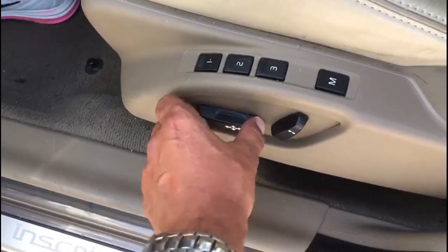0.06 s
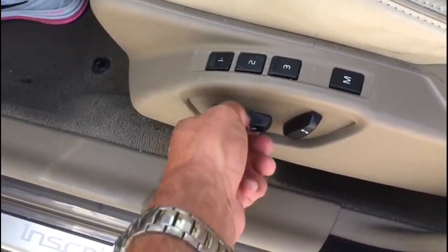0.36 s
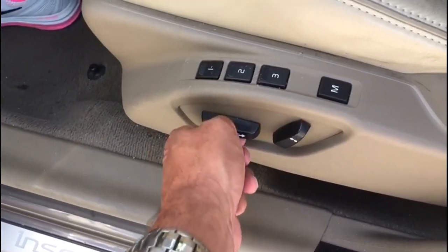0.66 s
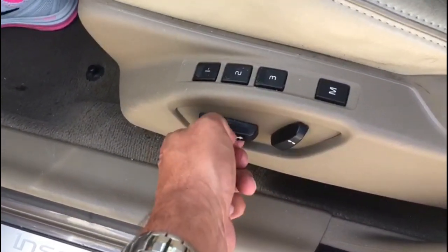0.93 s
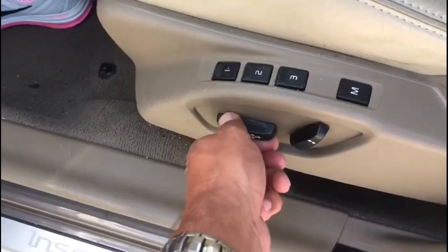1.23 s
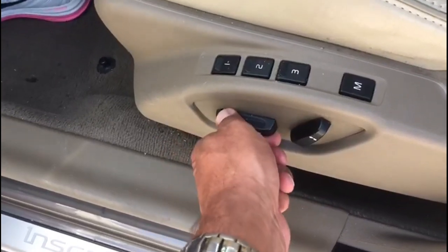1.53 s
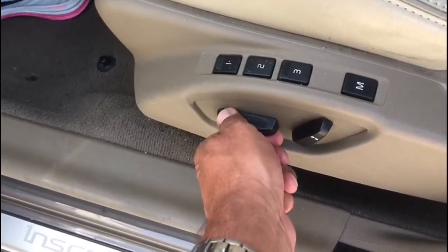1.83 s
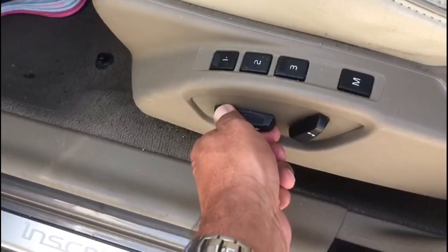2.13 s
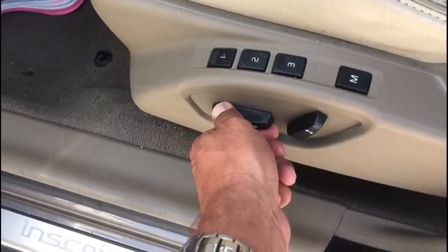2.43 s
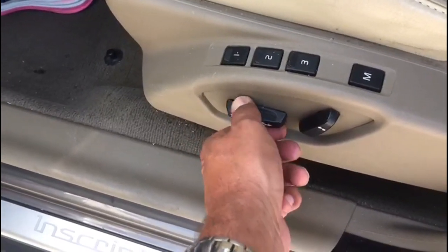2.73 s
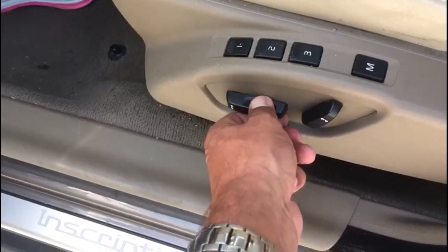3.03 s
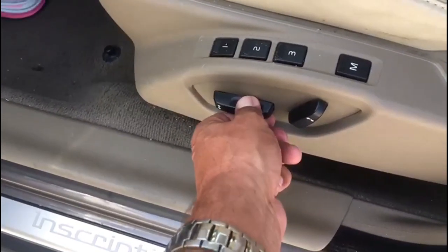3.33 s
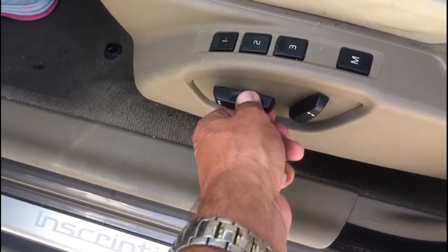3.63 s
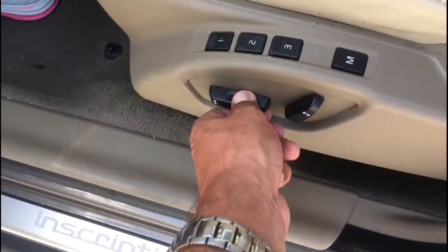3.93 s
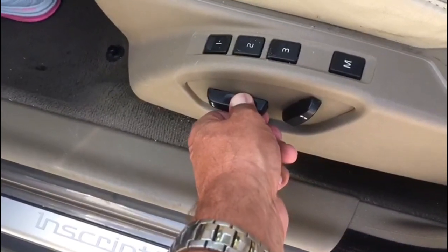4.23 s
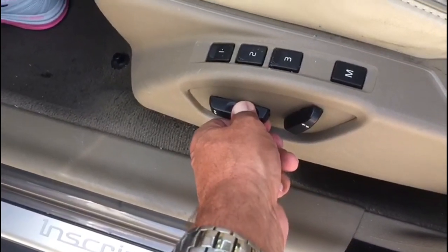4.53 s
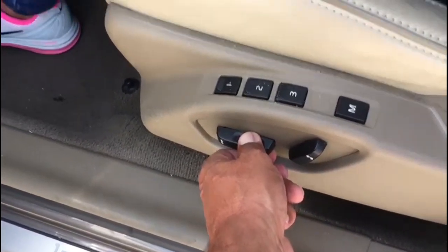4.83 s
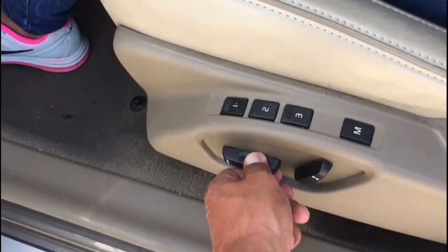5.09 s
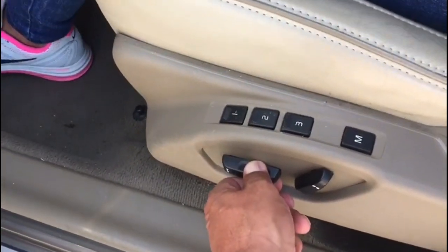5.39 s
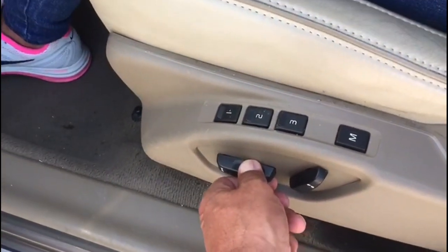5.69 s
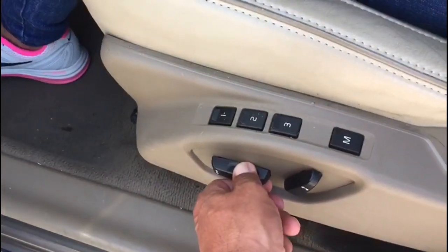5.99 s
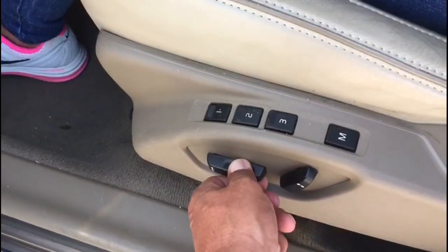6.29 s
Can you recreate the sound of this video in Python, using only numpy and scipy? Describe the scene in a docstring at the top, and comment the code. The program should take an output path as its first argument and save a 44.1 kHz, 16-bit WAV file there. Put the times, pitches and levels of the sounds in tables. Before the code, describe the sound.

Close to the microphone, a plastic seat switch clicks and taps unevenly while a hand bumps and brushes the side panel, and a small electric motor gives two short whirs. Then the clicking nearly ceases and the seat motor runs on with a quiet, thin, slightly raspy whine. Underneath, the parked car's idling engine makes an uneven low rumble in the cabin, with soft air from the vents.

```python
"""Inside a parked car, one microphone close beside the power seat.
The small seat motor runs in two short spells, then whines on, wavering with each turn of its worm wheel.
Within arm's reach the plastic switch clicks, a hand bumps and rubs the trim, and there are dull thumps
and knocks. Farther off the idling engine hums through the cabin, over faint ventilation and hiss."""
import sys
import numpy as np
from scipy import signal
from scipy.fft import rfft, irfft, next_fast_len
from scipy.io import wavfile
from scipy.ndimage import uniform_filter1d

SR = 44100
rng = np.random.default_rng(int(sys.argv[2]) if len(sys.argv) > 2 else 0)


def pcm_store(signal):
    """Save signal as 16-bit PCM."""
    levels = np.round(np.clip(np.atleast_2d(signal), -1, 1) * 32767)
    wavfile.write(sys.argv[1], SR, levels.astype(np.int16).T)


N = 280027
TIME = np.arange(N) / SR

ROTOR_SLOTS, WHEEL_TEETH = 10, 40
# spells with the switch held: (on [s], off [s], friction level [dB], rasp level [dB])
MOTOR_RUNS = [(-0.1, 0.23, -58, -70), (1.651, 2.05, -69, -71.5), (3.069, 6.5, -58.5, -70)]
# set speed of the motor, heard as its slot whine: (time [s], pitch [Hz], level [dB])
SLOT_WHINE = [(0, 1780, -64), (1.9, 1775, -71), (3.25, 1740, -63), (3.52, 1815, -64), (4.1, 1818, -62.5),
              (4.7, 1850, -61.8), (5.1, 1857, -63), (5.55, 1800, -64.5), (5.9, 1802, -64),
              (6.35, 1760, -59.5)]
# strain on the gears as the seat travels: (time [s], strain [0-1])
GEAR_STRAIN = [(0, 0), (1.75, 1), (2.1, 0.6), (3.05, 0), (4.1, 0), (4.6, 0.1), (5.2, 0.44), (5.5, 0.82),
               (6.35, 0.72)]
# tones relative to the slot whine: (order [x rotor speed], easy level [dB], strained level [dB])
ROTOR_TONES = [(1, 1, 12), (3, -8, -5), (5, -12, -11), (6, -12, -11), (13, -17, -14), (14, -15, -7),
               (18, -14, -15), (26, -25, -8.5), (30, -20, -27), (32, -19, -16), (34, -15, -10),
               (36, -22, -16), (42, -21, -26), (44, -17, -17), (48, -32, -28), (62, -29, -27),
               (64, -32, -34)]
# friction noise through the seat frame: (frequency [Hz], level [dB per Hz])
FRICTION_SPECTRUM = [(210, -11), (350, 4.5), (406, -3.5), (530, -4), (813, -8.5), (902, -6), (1610, -7),
                     (1810, -9), (1950, -7), (2360, -5.5), (2940, -13), (3220, -15.5), (4940, -22.5),
                     (6260, -18), (12000, -30.5), (15600, -68), (22000, -120)]
# gear housing resonances: (frequency [Hz], width [Hz], level [dB])
HOUSING_MODES = [(2360, 160, 0), (3130, 62, 5.5), (3830, 770, -0.5), (4490, 140, 7), (5370, 200, 0),
                 (6170, 110, -6), (6560, 200, -4.5), (8020, 150, -11), (10700, 210, -6)]
# narrow dips in the motor's hiss, from reflections off the floor and sill:
# (frequency [Hz], width [Hz], depth [0-1])
MOTOR_NOISE_DIPS = [(397, 74, 0.86), (760, 53, 0), (1114, 120, 0.7), (2030, 85, 0.57), (2910, 200, 0.7),
                    (4420, 170, 0.97), (5650, 230, .4), (7450, 380, 0.9), (8400, 400, 0.6),
                    (10600, 260, 0.5)]
def seat_motor(slot_flutter_db=1.15, flutter_db=3.5, chop=0.25, strain_rasp_db=4, noise_db=1.0):
    """Close up, under the seat: slots whine, other rotor orders sing, brushes and gears hiss in step."""
    whine_hz, whine_db = in_time(SLOT_WHINE)
    strain, = in_time(GEAR_STRAIN)
    power = sum(running(on, off) for on, off, *_ in MOTOR_RUNS)
    angle = rotor_angle(whine_hz, power)
    tones = from_db(slot_flutter_db * drift(25)) * np.sin(ROTOR_SLOTS * angle)
    for order, easy_db, strained_db in ROTOR_TONES:
        order_db = easy_db + strain * (strained_db - easy_db)
        tones += from_db(order_db + flutter_db * drift(6.7)) * np.sin(order * angle)
    friction_gain = sum(from_db(db) * running(on, off) for on, off, db, _ in MOTOR_RUNS)
    rasp_gain = sum(from_db(db) * running(on, off) for on, off, _, db in MOTOR_RUNS)
    contact = 1 + chop * np.sin(2 * angle)   # two brushes scrape twice a turn
    friction = friction_gain * coloured_noise(FRICTION_SPECTRUM) * contact
    housing = resonate(rng.standard_normal(N) * contact, HOUSING_MODES)
    rasp = rasp_gain * from_db(strain_rasp_db * strain) * housing
    noise = cancel(friction + rasp, MOTOR_NOISE_DIPS)
    return power * from_db(whine_db) * tones + from_db(noise_db) * noise


def running(on_s, off_s, spin_up_s=0.03, coast_s=0.04):
    """The motor spins up when switched on and coasts down when released; 0-1."""
    spin_up = 1 - np.exp(-np.maximum(TIME - on_s, 0) / spin_up_s)
    return spin_up * np.exp(-np.maximum(TIME - off_s, 0) / coast_s)


def rotor_angle(whine_hz, power, start_sag=0.1, swing_hz=19, freest_s=4.89, slip_rad=0.02):
    """The rotor is slower as it starts and stops, and sags as the worm wheel binds once a turn."""
    hz = whine_hz * (1 - start_sag * (1 - power))
    wheel_turns = np.cumsum(hz) / SR / ROTOR_SLOTS / WHEEL_TEETH
    wheel_turns -= np.interp(freest_s, TIME, wheel_turns)
    hz = hz + swing_hz * np.cos(2 * np.pi * wheel_turns)
    # uneven drag makes the rotor run slightly ahead and behind, which blurs the highest orders
    return 2 * np.pi * np.cumsum(hz / ROTOR_SLOTS) / SR + slip_rad * drift(8)


# contacts of the switch: (time [s], relative peak [dB], main ring [Hz], ring prominence [dB],
# brightness [dB per octave], body [dB])
SWITCH_CLICKS = [(0.2186, -25.5, 4650, 20, 4.5, 9), (0.2453, -25.5, 6700, 26, -3, 7),
                 (0.2559, -24, 6560, 23, -9.5, -12.5), (0.3533, -23.5, 3210, 1, -3.5, -11),
                 (0.3736, -35, 1900, -1, -6, -1), (0.473, -41, 2030, 8, -6, -16),
                 (0.5145, -34.5, 1650, 22, 3.5, 0), (0.5216, -30.5, 2240, 1, -3, -18),
                 (0.5544, -25, 6430, 4, 2, -8), (0.5651, -26, 2580, 6, 4, 8),
                 (0.595, -24.5, 6100, 10.5, 0.5, 7), (0.8054, -27.5, 6630, 3, 4.5, 18.5),
                 (0.815, -24, 5390, 27, -6, -16), (0.8806, -46.0, 1550, 0, -6, -2),
                 (1.0085, -40, 1660, -34, -12, -24), (1.1539, -25, 5000, 3, 3, -24),
                 (1.1779, -20.5, 4600, 3, 0, -9), (1.2075, -36, 2010, -6, -8, -22),
                 (1.2398, -47.5, 1840, 4, -3, -10), (1.271, -48.5, 1620, 4, -4, -8),
                 (1.3123, -34.5, 2160, 6, 0.5, -8), (1.356, -31.5, 1680, 6, -1.5, -18),
                 (1.384, -25, 7570, 15, -1, -22), (1.3944, -32.5, 6100, 12, -3, -1),
                 (1.405, -31.5, 4280, 5, -4, -19), (1.533, -30.5, 3780, 17, -12.5, -9),
                 (1.565, -39.5, 3950, 9, -4, 8), (1.6053, -25.0, 7230, 17, 0, -9),
                 (1.617, -28, 6900, 23, -8, -18), (1.6452, -34.5, 3360, 6, -14, -20),
                 (1.834, -43, 1520, 18, -4, -2), (2.042, -42.5, 2030, -4, -3, 7),
                 (2.2766, -35, 3250, 17, -9, -26), (2.3722, -39.5, 4200, 0, -3, -24),
                 (2.5848, -30, 2120, -4, -10.5, -28), (2.716, -27.5, 3180, 10, 0.5, -6),
                 (2.776, -35.5, 2240, 4, -3.5, 4), (2.962, -37, 1480, 8, -9, -35),
                 (2.9876, -41, 6200, -4, 1, -2), (3.0112, -33.0, 2070, -1.5, -2.5, -22),
                 (3.044, -24.5, 7450, 6, 3, 4), (3.054, -27.5, 7740, 9, 1, 7),
                 (4.9899, -39, 2310, 3, -0.5, 4)]
def switch(gain_db=-9.5):
    """Right by the microphone, the plastic switch snaps under the fingers."""
    out = np.zeros(N)
    for s, peak_db, ring_hz, *contact in SWITCH_CLICKS:
        click = colour_click(snap(ring_hz), ring_hz, *contact)
        add(out, s, from_db(peak_db + gain_db) * click)
    return out


# modes of the switch and its trim panel: (frequency [Hz], level [dB], t60 before ring_scale [s])
PANEL_MODES = [(640, -14, 0.093), (1112, -13, 0.068), (1835, -17.5, 0.083), (2170, -11.5, 0.059),
               (2495, -11, 0.036), (3630, -7.5, 0.01), (3930, -10, 0.041), (4570, -30, 0.075),
               (5690, -2, 0.016), (6080, -2, 0.027), (6560, -1, 0.03), (7190, 1, 0.024),
               (7380, -10, 0.0067), (7950, -19.5, 0.0084), (9700, 17, 0.005), (11280, 10, 0.015)]
def snap(main_hz, main_db=6, main_t60=0.025, ring_scale=0.76, spread_db=9.8, detune=0.0074,
         crack_db=12.0, crack_t60=0.028, cabin_db=-16, cabin_t60=0.17, rise_s=0.0015):
    """A short crack rings the panel; the upholstered cabin returns a brief tail."""
    t = np.arange(SR // 6) / SR
    hz, mode_db, t60 = np.transpose(PANEL_MODES)[:, :, None]
    strengths = from_db(mode_db + spread_db * rng.standard_normal(hz.shape))
    strengths *= rng.choice([-1, 1], hz.shape)
    pressed_hz = hz * (1 + detune * rng.standard_normal(hz.shape))   # the finger detunes the modes
    ring = np.sum(strengths * fade(t, t60 * ring_scale) * np.sin(2 * np.pi * pressed_hz * t), axis=0)
    ring += from_db(main_db) * fade(t, main_t60) * np.sin(2 * np.pi * main_hz * t)
    scatter = from_db(crack_db) * fade(t, crack_t60) + from_db(cabin_db) * fade(t, cabin_t60)
    return (ring + scatter * rng.standard_normal(len(t))) * (1 - np.exp(-t / rise_s))


# edges of a click's five bands: (frequency [Hz])
CLICK_EDGES = [400, 1400, 2800, 5000, 7800, 11300]
# colour that all clicks share, band by band: (level [dB])
CLICK_BAND_LEVELS = [-4, -1, 1.3, -3.5, -2]
def colour_click(sound, ring_hz, prominence_db, brightness_db, body_db, pivot_hz=4000, ring_octaves=0.32):
    """A hard contact is bright, a fleshy one has body, and its place favours one ring."""
    edges = np.array(CLICK_EDGES)
    centres = np.sqrt(edges[:-1] * edges[1:])
    near_ring = np.exp(-(np.log2(centres / ring_hz) / ring_octaves) ** 2)
    levels = CLICK_BAND_LEVELS + brightness_db * np.log2(centres / pivot_hz) + prominence_db * near_ring
    levels[0] += body_db
    click = 0
    for k, (db, low, high) in enumerate(zip(levels, edges, edges[1:])):
        click += (-1) ** k * from_db(db) * rms_one(band(sound, low, high))
    return click / np.sqrt(uniform_filter1d(click ** 2, size=176).max())   # loudest 4 ms at rms 1


# dull thumps and knocks; the last is the trim ringing under a hand bump:
# (time [s], level [dB], pitch [Hz], t60 [s])
DULL_THUMPS = [(1.582, -12.5, 139, 0.066), (1.636, -16.5, 108, 0.061), (2.28, -23, 46, 0.25),
               (2.392, -37.5, 430, 0.068), (2.406, -36.5, 337, 0.063), (2.415, -26.5, 184, 0.078),
               (3.061, -37.5, 588, 0.069)]
def thumps():
    """Dull thumps and knocks beside the microphone, each at its own pitch."""
    out = np.zeros(N)
    for s, db, hz, t60 in DULL_THUMPS:
        add(out, s, from_db(db) * knock(hz, t60))
    return out


# the hand meets the trim: (time [s], level [dB], brightness [dB per octave])
HAND_BUMPS = [(0.258, -50, 4), (0.575, -29, 0.5), (0.816, -28, -4), (1.011, -38.5, 1), (1.405, -36.5, -5),
              (1.614, -26.5, -2.5), (2.281, -40, -3), (3.064, -37, 0.5)]
# low modes of the side trim: (frequency [Hz], level [dB], t60 [s])
TRIM_MODES = [(262.6, -0.5, 0.12), (342, -12, 0.071), (580, -10, 0.055), (847, -10, 0.045)]
def trim_bumps():
    """Close by, each bump of the hand rings all the low modes of the trim."""
    out = np.zeros(N)
    for s, db, brightness_db in HAND_BUMPS:
        for k, (hz, mode_db, t60) in enumerate(TRIM_MODES):
            tilt_db = brightness_db * np.log2(hz / TRIM_MODES[0][0])
            add(out, s, (-1) ** k * from_db(db + mode_db + tilt_db) * knock(hz, t60))
    return out


def knock(hz, t60, rattle=0.52, rise_cycles=0.49):
    """A soft blow: a damped resonance amid weaker ones; the lower it is, the softer its attack."""
    t = np.arange(SR // 4) / SR
    spread = rms_one(band(rng.standard_normal(len(t)), hz * 0.88, hz * 1.28))
    attack = 1 - np.exp(-(t * hz / rise_cycles) ** 2)
    return (np.sin(2 * np.pi * hz * t) + rattle * spread) * fade(t, t60) * attack


# strokes along the trim: (middle [s], half length [s], level [dB])
RUB_STROKES = [(0.213, 0.042, -53.5), (0.264, 0.02, -52.5), (0.435, 0.039, -50.5), (0.514, 0.025, -56),
               (0.58, 0.029, -50), (0.662, 0.029, -59), (1.152, 0.0042, -47.5), (1.355, 0.022, -56),
               (1.609, 0.022, -49.5), (1.663, 0.046, -61), (2.29, 0.021, -53.5), (2.82, 0.028, -64),
               (2.903, 0.028, -54), (3.299, 0.089, -54.5), (3.573, 0.022, -56.5), (5.014, .02, -58),
               (5.8, 0.011, -57.5)]
# their colour: (frequency [Hz], level [dB per Hz])
RUB_SPECTRUM = [(410, -71), (700, 2), (1100, -6.5), (1790, -1), (2750, -10), (3060, -4.5), (4750, -10.5),
                (6170, -8.5), (12000, -17.5), (15600, -50), (22000, -120)]
def rubbing(grain_db=2.0):
    """Near but quiet, skin and sleeve brush the trim in short swells of grainy friction."""
    pressure = sum(from_db(db) * np.exp(-((TIME - s) / half) ** 2) for s, half, db in RUB_STROKES)
    return pressure * from_db(grain_db * drift(150)) * coloured_noise(RUB_SPECTRUM)


# the engine's boom at the seat: (time [s], relative level [dB])
CABIN_BOOM = [(0.0, -39.5), (0.85, -30), (0.99, -46), (1.04, -26.5), (1.18, -59), (1.25, -25.5),
              (1.31, -34), (1.84, -31), (2.07, -38.5), (2.1, -54), (2.28, -26.5), (2.49, -41.5),
              (2.53, -28), (2.78, -41.5), (2.85, -25), (3.11, -31), (3.18, -51), (3.25, -31), (3.96, -25),
              (4.26, -45), (4.37, -24), (4.6, -32.5), (4.69, -26.5), (5.11, -35.5), (5.29, -32),
              (6.35, -41.5)]
# overtones of the idle: (order [x firing rate], level [dB])
IDLE_OVERTONES = [(2, -43.5), (2.5, -57), (3, -56.5), (4, -62.5), (4.5, -67), (5, -72), (7, -71.5),
                  (12, -86.5)]
# their common swell: (time [s], gain [dB])
OVERTONE_SWELL = [(0, 5), (0.8, 0.5), (1.4, -1.5), (3.0, -2), (4.45, 5.5), (5.0, 1), (6.35, 0.5)]
# cabin rumble: (frequency [Hz], level [dB per Hz])
RUMBLE_SPECTRUM = [(26, -19), (40, -1), (58, 2), (75, -0.5), (98, 4), (135, -3), (190, -5), (260, -18),
                   (400, -33), (700, -42)]
def engine(firing_hz=74.82, hum_db=2.5, steady_boom_db=-23, flutter_db=3.0, wobble_rad=0.46,
           unsteady_db=1.5, overtone_wobble_rad=0.28, rumble_db=-38.0):
    """Heard from inside the cabin, the firing rate booms unevenly, with overtones over a rumble."""
    boom_db, = in_time(CABIN_BOOM)
    swell_db, = in_time(OVERTONE_SWELL)
    phase = 2 * np.pi * firing_hz * TIME
    weakness = np.clip((steady_boom_db - boom_db) / 10, .3, 1.5)   # a weaker boom flutters more
    hum_gain = from_db(boom_db + hum_db + flutter_db * weakness * drift(11))
    hum = hum_gain * np.sin(phase + wobble_rad * drift(3.5))
    overtones = 0
    for order, db in IDLE_OVERTONES:   # unequal cylinders add half orders
        gain = from_db(db + unsteady_db * drift(0.58))
        overtones += gain * np.sin(order * phase + overtone_wobble_rad * drift(3.2))
    return hum + from_db(swell_db) * overtones + from_db(rumble_db) * coloured_noise(RUMBLE_SPECTRUM)


# air from the vents: (frequency [Hz], level [dB per Hz])
AIR_SPECTRUM = [(240, -17), (400, -1.5), (587, -2.5), (838, -24), (926, -26), (1210, -8.5), (1320, -17.5),
                (1810, -16), (2030, -31), (2240, -13), (2470, -21), (4500, -22), (12000, -36.5),
                (15600, -70), (22000, -120)]
# duct resonances: (frequency [Hz], width [Hz], level [dB])
DUCT_MODES = [(453, 42, -2), (508, 31, 4.5), (624, 14, -21), (912, 55, 6.5), (1230, 20, -7), (1816, 35, 0),
              (2260, 53, -10)]
def ventilation(air_db=-61, duct_db=-65):
    """Across the cabin, soft air noise sets the ducts ringing."""
    air = from_db(air_db) * coloured_noise(AIR_SPECTRUM)
    return air + from_db(duct_db) * resonate(rng.standard_normal(N), DUCT_MODES)


# course of the background hiss: (time [s], level [dB])
HISS_SWELL = [(0.3, -62.5), (1.6, -69), (2.7, -66.5), (3.2, -64.5), (6.35, -67.5)]
# its colour: (frequency [Hz], level [dB per Hz])
HISS_SPECTRUM = [(210, -12), (350, 0.5), (530, -7.5), (900, -5), (2300, -10), (3200, -19.5), (4900, -19.5),
                 (6300, -17.5), (12000, -24), (15600, -68)]
def hiss():
    """Behind everything, a faint hiss slowly changes in level."""
    level_db, = in_time(HISS_SWELL)
    return from_db(level_db) * coloured_noise(HISS_SPECTRUM)


def from_db(db):
    """Decibels to gain."""
    return 10 ** (np.asarray(db) / 20)


def rms_one(x):
    """Scale to rms 1."""
    return x / np.sqrt(np.mean(x ** 2) + 1e-20)


def in_time(rows):
    """Each column of a curve at every sample."""
    s, *columns = np.transpose(rows)
    return [np.interp(TIME, s, c) for c in columns]


def drift(rate_hz):
    """Smooth random wander, rms 1."""
    hop, settle = 40, 2000
    r = np.exp(-2 * np.pi * rate_hz * hop / SR)
    slow = signal.lfilter([1], [1, -2 * r, r * r], rng.standard_normal(N // hop + settle + 2))[settle:]
    return np.interp(np.arange(N) / hop, np.arange(len(slow)), rms_one(slow))


def coloured_noise(spectrum):
    """Noise with the given spectrum, falling steeply past its ends; rms 1."""
    hz, db = np.transpose(spectrum)
    size = next_fast_len(N)
    f = np.maximum(np.fft.rfftfreq(size, 1 / SR), 1)
    skirts = np.minimum(1, np.minimum(f / hz[0], hz[-1] / f)) ** 4
    gain = from_db(np.interp(np.log(f), np.log(hz), db)) * skirts
    return rms_one(irfft(rfft(rng.standard_normal(size)) * gain, size)[:N])


def resonate(x, peaks):
    """Ring parallel resonances of alternating sign; rms 1."""
    out = 0
    for k, (hz, width, db) in enumerate(peaks):
        r = np.exp(-np.pi * width / SR)
        feedback = [1, -2 * r * np.cos(2 * np.pi * hz / SR), r * r]
        out += (-1) ** k * from_db(db) * (1 - r * r) * signal.lfilter([1, 0, -1], feedback, x)
    return rms_one(out)


def cancel(x, dips):
    """Take a share of each narrow band away."""
    for hz, width, depth in dips:
        x = x - depth * signal.lfilter(*signal.iirpeak(hz, hz / width, fs=SR), x)
    return x


def band(x, low_hz, high_hz):
    """Causal band-pass."""
    return signal.sosfilt(signal.butter(2, [low_hz, high_hz], "band", fs=SR, output="sos"), x)


def fade(t, t60):
    """Free decay, 60 dB down after t60."""
    return np.exp(-np.log(1000) * t / t60)


def add(track, s, sound):
    """Mix a sound in at time s."""
    at = round(s * SR)
    track[at:at + len(sound)] += sound[:N - at]


def scene():
    """The cabin and the sounds close at hand, in mono from beside the seat."""
    cabin = engine() + ventilation() + hiss()
    return (cabin + seat_motor() + switch() + trim_bumps() + thumps() + rubbing())[None]


def record(dry, cutoff_hz=12050):
    """The microphone's signal, with the top cut steeply."""
    return signal.sosfilt(signal.ellip(10, .2, 80, cutoff_hz, fs=SR, output="sos"), dry)


dry = scene()
out = record(dry)
pcm_store(out)
```